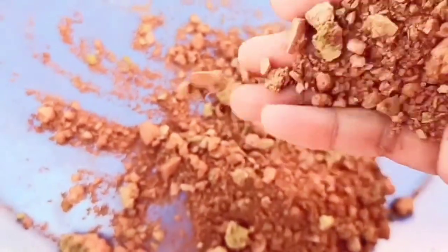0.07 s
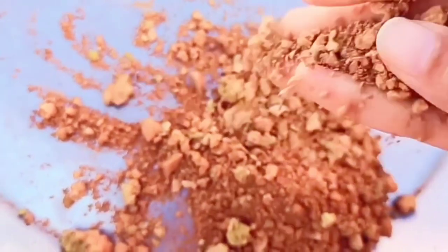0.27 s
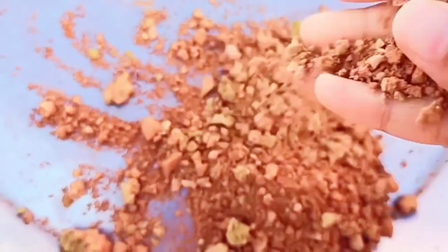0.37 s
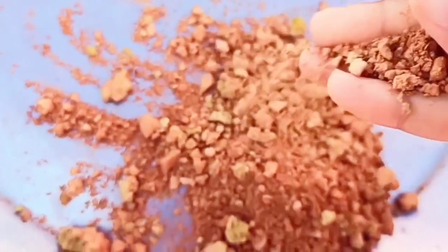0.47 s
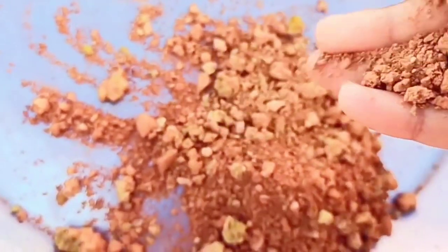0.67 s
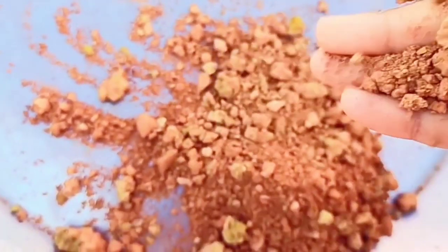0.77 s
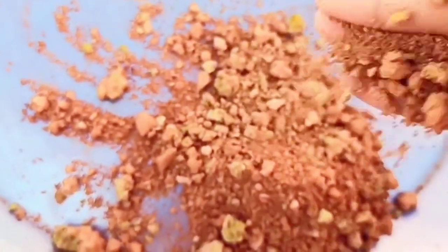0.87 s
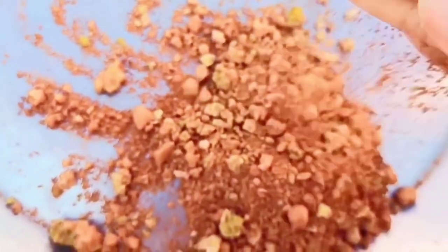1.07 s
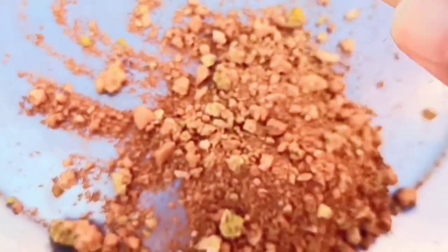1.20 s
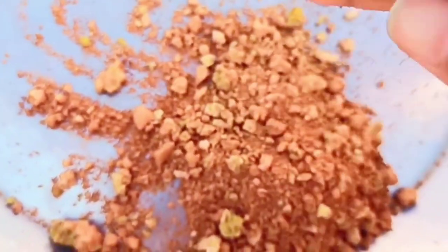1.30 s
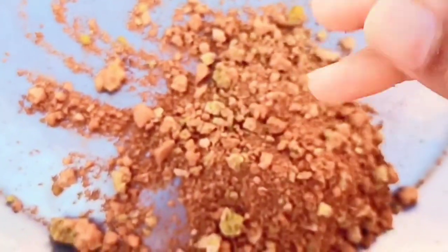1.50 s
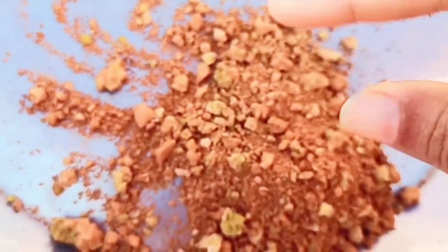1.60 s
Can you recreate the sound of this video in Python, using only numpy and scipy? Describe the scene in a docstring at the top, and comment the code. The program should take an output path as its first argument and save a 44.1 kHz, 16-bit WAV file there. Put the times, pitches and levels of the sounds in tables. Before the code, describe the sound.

Dry clay lumps fall onto a heap on a plate, close up, with knocks and clacks from the start and the loudest, briefly ringing clack at about 0.25 seconds. Light crumbs tick until 0.7. From 0.85 to 1.2 seconds the rest tumbles out with clacks, trickling grit and a few faint thin whistles. Small ticks follow until about 1.6 seconds, over a low room rumble.

```python
"""A small hard room, one microphone close to a plate: dry clay is crumbled by hand over a heap on it.
Lumps drop with sharp clacks and dull knocks that set the plate ringing. Crumbs tick and grit trickles
between them, and the rest of the handful is tipped out. A few faint thin whistles, perhaps a bird,
sound over a low room rumble."""
import sys
import numpy as np
from scipy import signal
from scipy.fft import rfft, irfft, next_fast_len
from scipy.io import wavfile
from scipy.ndimage import uniform_filter1d

SR = 44100
rng = np.random.default_rng(int(sys.argv[2]) if len(sys.argv) > 2 else 0)


def log_audio(samples):
    """Write samples as a 16-bit WAV file to the path given in sys.argv[1]."""
    # one column per channel
    frames = np.atleast_2d(samples).T
    # limit to full scale, then quantise
    limited = np.clip(frames, -1, 1)
    pcm = np.round(limited * 32767).astype(np.int16)
    wavfile.write(sys.argv[1], SR, pcm)


N = 72765

# Falling lumps. Each row: start in seconds, ring length as a multiple of the usual, then relative
# levels in dB of thud, knock, rap, clack, tick and fine chips.
LUMP_FALLS = [(0, 1.14, -36.5, -36, -35, -29.5, -41, -44), (0.0522, 0.84, -68, -54, -46.5, -36.5, -62, -83),
              (0.1246, 0.97, -42.5, -43, -55, -50, -54, -58),
              (0.1317, 1.1, -41.5, -36.5, -49, -44, -72, -79),
              (0.2409, 0.99, -41, -31.5, -26, -10.5, -16.5, -28.5),
              (0.3084, 1.0, -45.5, -56.5, -56, -41, -50, -71),
              (0.4375, 1.4, -66, -48.5, -48.5, -53, -81, -81), (0.46, 1.8, -57, -51.5, -66, -53, -59, -69),
              (0.501, 1.4, -60.5, -65, -63.5, -49.5, -59, -67),
              (0.513, 0.82, -74, -61.5, -60.5, -53, -75, -81),
              (0.667, 1.0, -57.5, -74.5, -70, -61, -85, -88),
              (0.8479, 0.98, -41, -33.5, -32, -29.5, -48.5, -60),
              (0.877, 1.9, -72, -45.5, -49, -53, -72, -82), (0.931, 0.33, -65, -49.5, -48.5, -52, -59, -73),
              (0.956, 1.1, -71, -54, -59, -41, -52, -58), (0.971, 0.95, -49.5, -60, -53, -38.5, -48, -50.5),
              (0.9889, 0.68, -45.5, -40, -50, -41, -68, -73), (1.029, 1.7, -58, -60, -52, -54, -67, -80),
              (1.0635, 0.7, -58, -57, -57, -44.5, -59, -76),
              (1.081, 0.7, -62.5, -58, -48, -34.5, -47.5, -66),
              (1.107, 0.81, -66, -63.5, -63, -49, -54, -65),
              (1.156, 0.62, -72, -61.5, -61, -47, -56, -66.5),
              (1.191, 0.86, -70, -60.5, -76, -60, -60.5, -68),
              (1.5139, 0.66, -68, -78, -72.5, -55, -57, -61)]
# Single crumbs. Each row: start in seconds, level in dB.
CRUMB_FALLS = [(0.229, -56.5), (.422, -60.5), (.528, -58), (.579, -67.5), (.619, -70), (0.762, -69.5),
               (1.308, -70), (1.393, -68), (1.435, -67.5), (1.529, -64.5), (1.608, -69)]
# Rise and fall of the grit and of the rumble. Each row: time in seconds, level in dB.
TRICKLE_LEVEL = [(0, -49.5), (.09, -63), (.21, -71), (.33, -62), (.41, -67.5), (.48, -58), (.54, -58),
                 (.6, -73.5), (.86, -82), (.93, -50), (.99, -58), (1.03, -66), (1.12, -50.5), (1.22, -65),
                 (1.35, -80), (1.42, -70), (1.51, -63.5), (1.55, -79)]
RUMBLE_LEVEL = [(0, -49), (.17, -50), (.23, -64), (.32, -55), (.39, -63.5), (.53, -51), (.75, -62),
                (.85, -63.5), (.92, -56), (1.02, -47), (1.15, -53.5), (1.3, -63.5), (1.52, -60.5),
                (1.65, -65)]
# Colours of a blow's parts, dull to bright. Each row: frequency in Hz, relative level in dB.
THUD_COLOUR = [(60, -43.5), (130, -25), (220, -9), (290, 4), (380, -5), (520, -6.5), (750, -29),
               (2000, -70)]
KNOCK_COLOUR = [(100, -61), (350, -29), (560, -5), (790, 5.5), (1000, -3.5), (1250, -14), (2200, -46.5),
                (5000, -74)]
RAP_COLOUR = [(200, -65), (900, -25), (1120, -4), (1270, -4), (1500, -8.5), (1800, -5), (2400, -3.5),
              (2800, -0.5), (4200, -40.5), (9000, -71)]
CLACK_COLOUR = [(300, -71), (1600, -38.5), (2600, -14), (3050, -2), (3700, 0.5), (4350, -4.5), (4900, -1),
                (6200, -4), (7300, -20), (10000, -45.5), (15000, -66)]
TICK_COLOUR = [(800, -65), (3800, -26), (6000, -2.5), (7500, 3.5), (9000, -0.5), (10300, -9.5),
               (13000, -34.5)]
CHIP_COLOUR = [(2000, -61), (7000, -19.5), (10000, 2), (11500, 1), (13500, -6.5), (15200, -0.5)]
# Colours of grit, room rumble and room air. Each row: frequency in Hz, relative level in dB.
GRIT_COLOUR = [(800, -25), (2400, -7.5), (3300, 0.5), (6000, 1.5), (9000, -7), (12500, -18), (15200, -5.5)]
RUMBLE_COLOUR = [(20, -32.5), (42, -21.5), (65, -4), (100, -5), (135, 1.5), (165, -2), (215, -11.5),
                 (300, -5.5), (420, -17.5), (800, -18), (2000, -45)]
AIR_COLOUR = [(30, -13.5), (200, -0.5), (700, -0.5), (1700, -7), (5000, -18.5), (9000, -23.5),
              (13000, -28.5), (15200, -21.5)]
# The plate's low, middle and high notes. Each row: frequency in Hz, relative level in dB.
HOLLOW_MODES = [(291, -4), (700, -6), (743, -1), (818, -1), (910, -6), (975, -2), (1080, -8), (1244, -5)]
MIDDLE_MODES = [(1244, 0), (1278, -5), (1690, -9), (1820, -6), (2132, -3), (2310, -3), (2430, -3)]
BRIGHT_MODES = [(3020, -9), (3155, -4), (3465, -2), (3549, -4), (3661, -3), (4050, -6), (4187, -5),
                (4774, 0), (4934, -5), (5350, -4), (5459, -3), (5906, -9), (6084, -5), (6687, -4),
                (7063, -9), (8275, -15)]
# Whistles, one curve each. Each row: time in seconds, pitch in Hz, level in dB before the echo.
WHISTLE_CURVES = [
    [(0.87, 4284, -50.5), (.889, 3950, -37.5), (.902, 3340, -44.5), (.915, 2340, -49), (.925, 1930, -58)],
    [(1.008, 4480, -62), (1.028, 4580, -53), (1.06, 4240, -54.5), (1.07, 3660, -39.5), (1.084, 3150, -50)],
    [(1.11, 1354, -61), (1.145, 1355, -56.5), (1.175, 1290, -65)],
]

ATTACK_S, CRUSH_S = 0.00063, 0.005  # a lump lands, then crushes and settles
CONTACT_DB, CONTACT_T60_S = -6, 0.02  # the first contact stands out over the echoes
DROP_AT_S, DROP_DB = 0.3165, 6.5  # the ring of the loudest clack drops away abruptly
RATTLES_PER_S = 70
GRIT_PER_S, GRIT_SPREAD_DB, GRIT_T60_S = 450, 3.5, 0.027
WHISTLE_ECHO_DB, WHISTLE_ECHO_T60_S = 0.5, 0.075
AIR_DB = -68.5
PEAK_LIMIT, LOW_CUT_HZ, TOP_HZ = 0.97, 21, 15550


def lumps():
    """Close up, each lump thuds on the heap, knocks the plate, clacks on hard clay and sheds chips."""
    out, t = np.zeros(N), np.arange(SR // 3) / SR
    for start, length, thud_db, knock_db, rap_db, clack_db, tick_db, chip_db in LUMP_FALLS:
        thud = impact(THUD_COLOUR, t60=0.056, tail_db=-15.5, tail_t60=0.48, rough_db=2)
        knock = impact(KNOCK_COLOUR, t60=0.06, tail_db=-18.5, tail_t60=0.22, rough_db=-1.5)
        # The heap damps most of the low notes' strength at once; the rest lingers faintly.
        knock += amp(-3.5) * plate_ring(HOLLOW_MODES, t60=0.045, spread_db=3)
        knock += amp(-6) * plate_ring(HOLLOW_MODES, t60=0.41, spread_db=2.5, rattle=0.7)
        rap = impact(RAP_COLOUR, t60=0.12 * length, tail_db=-14, tail_t60=0.38, rough_db=3.5)
        rap += amp(-8) * plate_ring(MIDDLE_MODES, t60=0.25, spread_db=1.5)
        clack = impact(CLACK_COLOUR, t60=0.115 * length, tail_db=-24, tail_t60=0.39, rough_db=1.6)
        ring_db = -6 + 0.15 * (clack_db + 28)  # harder blows ring the plate more
        clack += amp(ring_db) * plate_ring(BRIGHT_MODES, t60=0.135 * length, spread_db=2.6)
        tick = impact(TICK_COLOUR, t60=0.11 * length, tail_db=-29, tail_t60=0.23, rough_db=3.1)
        chips = impact(CHIP_COLOUR, t60=0.09 * length, tail_db=-29.5, tail_t60=0.25, rough_db=0.46)
        low = amp(thud_db) * thud + amp(knock_db - 2.5) * knock
        high = amp(rap_db) * rap + amp(clack_db - 2) * clack + amp(tick_db) * tick + amp(chip_db) * chips
        if start < DROP_AT_S:
            high *= amp(-DROP_DB * np.clip((start + t - DROP_AT_S) / 0.002, 0, 1))
        add(out, start, low + high)
    return out


def impact(colour, t60, tail_db, tail_t60, rough_db):
    """One part of a blow: dense contacts and wall echoes that die fast, then a weak room tail."""
    t = np.arange(SR // 3) / SR
    settled = np.maximum(t - CRUSH_S, 0)
    fade = np.hypot(decay(settled, t60), amp(tail_db) * decay(settled, tail_t60))
    fade += amp(CONTACT_DB) * decay(t, CONTACT_T60_S)
    roughness = amp(rough_db * unit(uniform_filter1d(rng.standard_normal(len(t)), size=40)))
    contacts = rng.standard_normal(len(t)) * roughness
    return unit_onset(tint(contacts * attack(t) * fade, colour))


def plate_ring(modes, t60, spread_db, rattle=0.15):
    """The plate's modes, struck a little differently each time; loose clay on it makes each waver."""
    t = np.arange(SR // 3) / SR
    knots = np.arange(64) / RATTLES_PER_S
    ring = np.zeros(len(t))
    for hz, db in modes:
        sway, drift = (np.interp(t, knots, rng.standard_normal(len(knots))) for _ in range(2))
        strength = amp(db + spread_db * rng.standard_normal()) * (1 + rattle * sway)
        ring += strength * np.sin(2 * np.pi * (hz * t + rng.random()) + rattle * drift)
    return unit_onset(ring * attack(t) * decay(t, t60))


def crumbs():
    """Small crumbs land near the microphone with short bright ticks."""
    out = np.zeros(N)
    for start, db in CRUMB_FALLS:
        tick = impact(GRIT_COLOUR, t60=0.062, tail_db=-19.5, tail_t60=0.15, rough_db=0.5)
        add(out, start, amp(db) * tick)
    return out


def trickle():
    """Grit patters at random, every grain smeared by the room."""
    out, t = np.zeros(N), np.arange(SR // 8) / SR
    grain_kinds = 4
    for _ in range(grain_kinds):
        lands = rng.random(N) < GRIT_PER_S / (grain_kinds * SR)
        grains = lands * amp(GRIT_SPREAD_DB * np.clip(rng.standard_normal(N), -2, 2))
        tick = rng.standard_normal(len(t)) * decay(t, GRIT_T60_S)
        out += signal.fftconvolve(grains, tint(tick, GRIT_COLOUR))[:N]
    return unit(out) * level(TRICKLE_LEVEL)


def whistles():
    """Faint thin whistles, perhaps a bird, end on a falling pitch, blurred by the room."""
    direct = np.zeros(N)
    for curve in WHISTLE_CURVES:
        times, hz, db = np.transpose(curve)
        t = np.arange(times[0], times[-1], 1 / SR)
        tone = np.sin(2 * np.pi * np.cumsum(np.interp(t, times, hz)) / SR)
        envelope = amp(np.interp(t, times, db)) * signal.windows.tukey(len(t), 0.1)
        add(direct, times[0], envelope * tone)
    walls = rng.standard_normal(SR // 8) * decay(np.arange(SR // 8) / SR, WHISTLE_ECHO_T60_S)
    echo = signal.fftconvolve(direct, walls / np.linalg.norm(walls))[:N]
    return direct + amp(WHISTLE_ECHO_DB) * echo


def room_tone():
    """Behind it all, a low rumble swells with the handling, over faint steady air."""
    return noise(RUMBLE_COLOUR) * level(RUMBLE_LEVEL) + amp(AIR_DB) * noise(AIR_COLOUR)


def amp(db):
    """Decibels to gain."""
    return 10 ** (np.asarray(db) / 20)


def attack(t):
    """The quick rise of a blow."""
    return 1 - np.exp(-t / ATTACK_S)


def decay(t, t60):
    """Gain that falls 60 dB in t60 seconds."""
    return amp(-60 * t / t60)


def unit(x):
    """x at rms 1."""
    return x / np.sqrt(np.mean(x ** 2) + 1e-20)


def unit_onset(x):
    """x with its first 20 ms at rms 1."""
    return x / np.sqrt(np.mean(x[:SR // 50] ** 2))


def level(curve):
    """Gain per sample of a curve of seconds and dB."""
    times, db = np.transpose(curve)
    return amp(np.interp(np.arange(N) / SR, times, db))


def colour_gain(colour, size):
    """A colour's gain at each bin of an FFT of this size."""
    hz, db = np.transpose(colour)
    bin_hz = np.fft.rfftfreq(size, 1 / SR)
    return amp(np.interp(np.log(bin_hz + 1), np.log(hz), db))


def noise(colour):
    """Steady coloured noise at rms 1."""
    gain = colour_gain(colour, N)
    return unit(irfft(gain * np.exp(2j * np.pi * rng.random(len(gain))), N))


def tint(x, colour):
    """x coloured by a causal, minimum-phase filter."""
    size = 2 * len(x)
    cepstrum = irfft(np.log(colour_gain(colour, size)), size)
    cepstrum[1:len(x)] *= 2
    response = np.exp(rfft(cepstrum[:len(x)], size))
    return irfft(rfft(x, size) * response, size)[:len(x)]


def add(track, start, sound):
    """Mix a sound into the track, start in seconds."""
    i = round(start * SR)
    track[i:i + len(sound)] += sound[:N - i]


def scene():
    """Everything at one microphone close to the plate."""
    return (lumps() + crumbs() + trickle() + whistles() + room_tone())[None]


def record(dry):
    """The loudest peaks are rounded off; the deepest bass and the highest treble are cut."""
    rounded = dry / (1 + np.abs(dry / PEAK_LIMIT) ** 10) ** (1 / 10)
    low_cut = signal.sosfilt(signal.butter(2, LOW_CUT_HZ, "highpass", fs=SR, output="sos"), rounded)
    size = next_fast_len(N + SR // 2)
    passband = np.clip((TOP_HZ - np.fft.rfftfreq(size, 1 / SR)) / 400 + 0.5, 0, 1)  # edge 400 Hz wide
    return irfft(rfft(low_cut, size) * passband, size)[:, :N]


dry = scene()
out = record(dry)
log_audio(out)
```